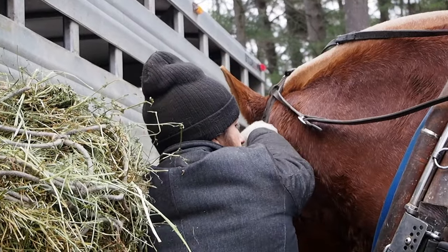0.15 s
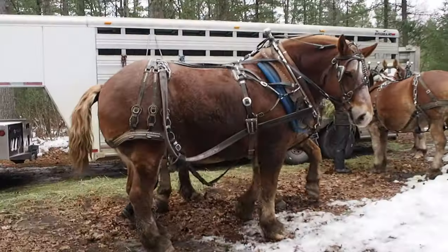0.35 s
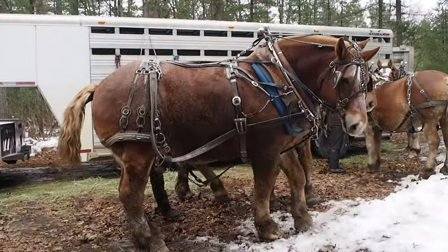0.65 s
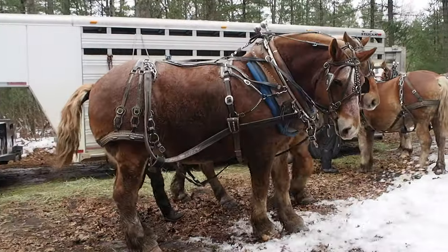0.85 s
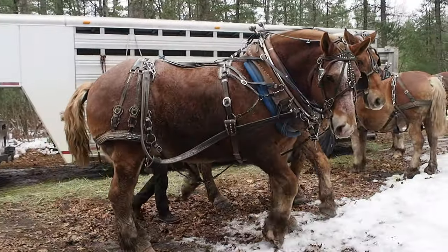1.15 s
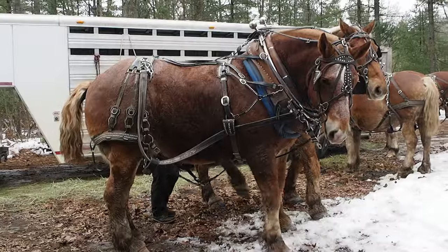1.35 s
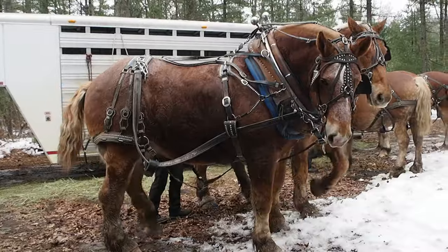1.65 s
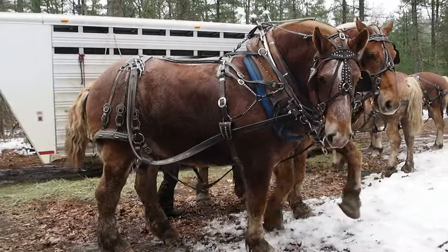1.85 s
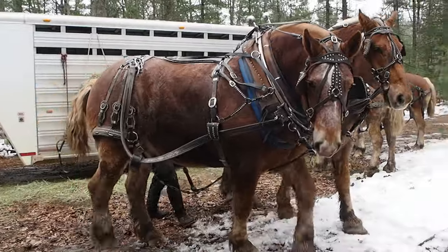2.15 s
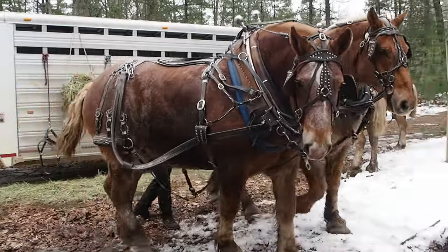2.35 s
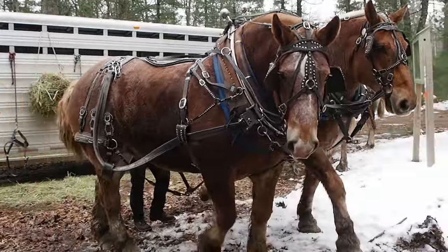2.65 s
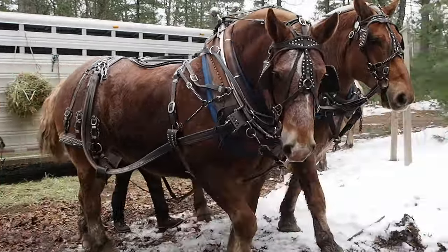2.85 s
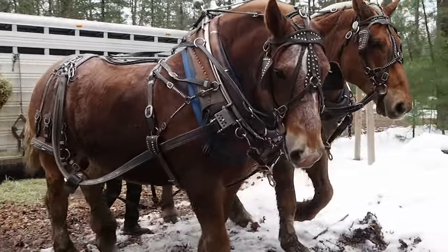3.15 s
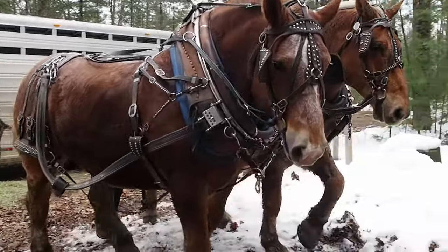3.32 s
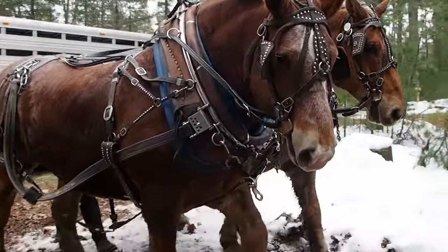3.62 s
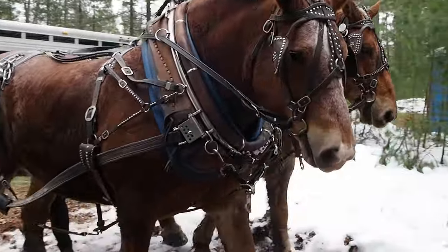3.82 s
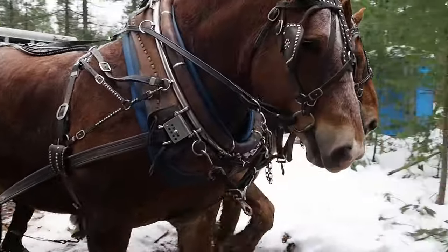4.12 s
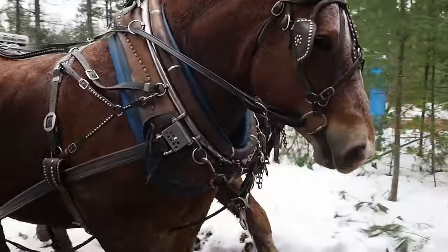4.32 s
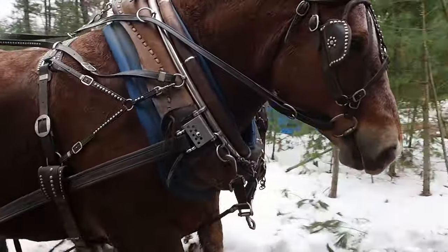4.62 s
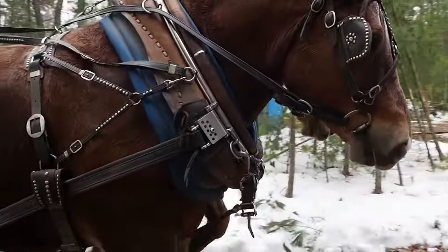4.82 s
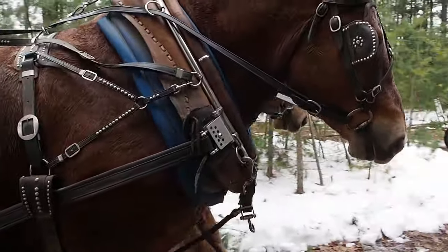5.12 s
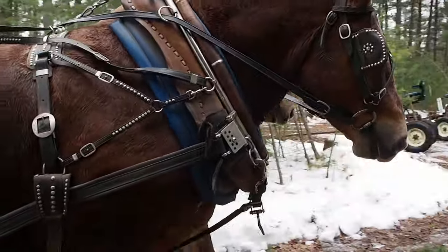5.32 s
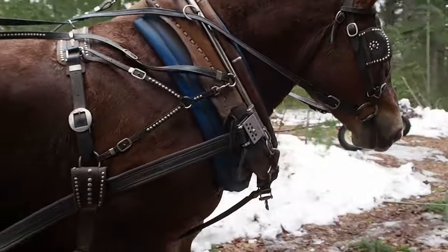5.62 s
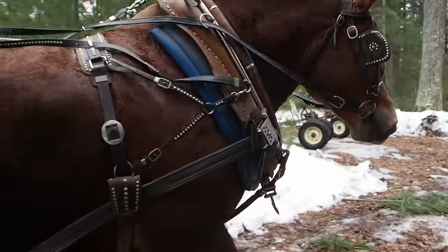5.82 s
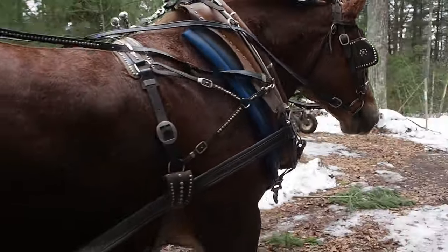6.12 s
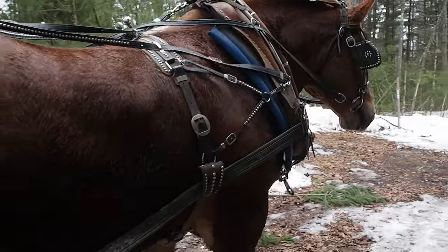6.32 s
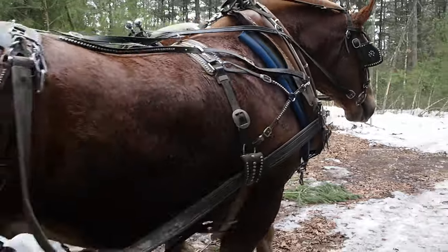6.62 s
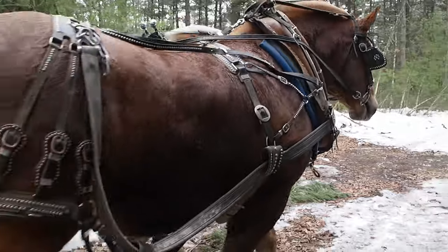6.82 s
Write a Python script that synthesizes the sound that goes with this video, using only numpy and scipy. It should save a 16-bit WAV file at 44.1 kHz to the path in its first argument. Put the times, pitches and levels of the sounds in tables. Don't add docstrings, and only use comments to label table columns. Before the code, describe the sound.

From 0 to 0.29 s it is quiet: muffled shuffling and a faint low bump, then a blink of complete silence. Around 0.3 s the fuller outdoor sound opens with a twig snap, and a strong dull hoof thud lands at 0.5 s. Until about 3.3 s heavy hooves crush and drag through wood chips, slightly left, with dry twig cracks and a growing rustle. The steps move right and become crisper on snow from 3.5 s. Harness metal enters at 3.7 s: uneven bright clinks and short ringing near 3.85, 4.2 and 4.5 s, dense buckle ticks around 5.1 s, the hardest double clink at 5.3 s, another cluster at 5.7 s. Deep thuds at 5.9 and 6.3 s sit right; a thin high chime rings at 6.05 s. Smaller ticks and crunches continue to 7 s, over soft wind, faint engine hum and slight clearing echoes.

```python
import sys
import numpy as np
from scipy import signal
from scipy.fft import rfft, irfft
from scipy.io import wavfile
from scipy.ndimage import uniform_filter1d

SR = 44100
rng = np.random.default_rng(int(sys.argv[2]) if len(sys.argv) > 2 else 0)


def invert_db(x):
    u = np.asarray(x, float) / 20
    return 10 ** u


def file_out(sig):
    cols = np.atleast_2d(sig).T
    lim = np.clip(cols, -1, 1)
    pcm = np.round(lim * 32767).astype(np.int16)
    wavfile.write(sys.argv[1], SR, pcm)


N = 307509

# start in seconds, end in seconds, fade-in in seconds.
SHOT_CHANGE = (0.2875, 0.3065, 0.011)
# time in seconds, bearing from 1 (left) to -1 (right).
TEAM_BEARING = [
    (0.5, 0.32),
    (2.2, 0.24),
    (3.2, -1.1),
    (6.9, -1.2),
]

# frequency in Hz, density in dB per Hz.
WIND_COLOUR = [(30, -40), (45, -36), (60, -15), (75, -2.5), (125, -0.5), (170, -8.5), (250, -4.5)]
# start in seconds, peak in dB.
GROUND_SHAKES = [(0.11, -46), (0.57, -45.5), (1.465, -41), (1.739, -58), (2.096, -40), (2.292, -42),
                 (2.422, -45), (3.416, -47), (4.08, -48), (4.383, -37), (4.855, -38.5), (5.165, -32.5),
                 (5.215, -41), (5.269, -48), (5.483, -39), (5.577, -41), (5.762, -42), (5.84, -50),
                 (5.878, -34), (6.037, -37), (6.16, -39), (6.33, -44), (6.367, -40), (6.463, -44),
                 (6.576, -42), (6.7, -41), (6.89, -48)]

# frequency in Hz, density in dB per Hz.
GROUND_COLOUR = [(60, -56), (170, -13.5), (350, -5), (650, -3.5), (1050, -6.5), (1400, -4), (1900, -5),
                 (2500, -4), (3100, -1), (4400, -1.5), (5400, -8.5), (7000, -11.5), (11000, -15),
                 (14000, -21), (16000, -30), (16700, -60)]
# frequency in Hz, level in dB.
SIDE_WIDTH = [(100, -1), (250, -3), (700, -3.5), (1300, -6.5), (2400, -9.5), (3200, -13), (4400, -13),
              (5800, -5), (8000, 1.5), (15000, 0.5)]
# frequency in Hz, likeness from 0 to 1.
SIDE_LIKENESS = [(150, 0.04), (600, 0.27), (2000, 0.35), (4000, 0.3), (6000, 0.02)]
# frequency in Hz, likeness from 0 to 1.
CAPSULE_LAG = [(2000, 0.13), (7000, 0.4)]
# time in seconds, level in dB.
BEDDING_SHUFFLE = [(0.0, -47), (0.12, -52), (0.27, -53.5), (0.322, -45), (0.336, -42.5), (0.74, -44),
                   (1.2, -45.5), (1.61, -45), (1.9, -43), (2.48, -39), (3.2, -42.5), (4.07, -40.5),
                   (4.94, -40), (5.5, -40), (5.81, -39.5), (6.35, -38.5), (6.97, -42)]
# middle in seconds, level in dB, weight in dB,
# half length in seconds.
HOOF_DRAGS = [(0.61, -45.5, 7.5, 0.11), (1.012, -40, -15.5, 0.28), (1.194, -37, -9, 0.11),
              (1.454, -39.5, -5.5, 0.22), (1.784, -35.5, -8, 0.13), (2.182, -36, -7.5, 0.36),
              (2.785, -31.5, -6, 0.12), (2.936, -32, -8, 0.31), (3.053, -33.5, -12.5, 0.28),
              (3.43, -34.5, -14.5, 0.29), (3.624, -39, 3.5, 0.097), (3.776, -36.5, -12, 0.27),
              (3.921, -33, -6, 0.14), (4.251, -36, -4.5, 0.15), (4.48, -41.5, -1, 0.12),
              (4.69, -35.5, -2.5, 0.19), (5.104, -43, -6, 0.13), (5.235, -28, -13.5, 0.19),
              (5.42, -37, -19, 0.32), (5.682, -39, -6.5, 0.084), (5.975, -31.5, -15, 0.081),
              (6.095, -34.5, -8.5, 0.17), (6.542, -39, -6.5, 0.17), (6.79, -35, -7, 0.27)]
# start in seconds, peak in dB, weight in dB, T60 in seconds.
CHIP_CRUSHES = [(0.2576, -30, -7, 0.046), (0.3634, -18.5, -7.5, 0.027), (0.546, -15, -9, 0.1),
                (0.579, -22.5, 0, 0.042), (0.5974, -30.5, 10.5, 0.034), (0.65, -29, -3, 0.27),
                (0.8589, -24, -7, 0.037), (0.882, -27, -7.5, 0.054), (1.1043, -20.5, -8.5, 0.1),
                (1.2156, -23, -6, 0.18), (1.468, -24.5, -5, 0.052), (1.6127, -24.5, -6, 0.029),
                (1.729, -12.5, -13.5, 0.084), (1.842, -25.5, -20, 0.073), (1.97, -17.5, -7.5, 0.089),
                (2.103, -13.5, -32, 0.027), (2.08, -23, -3, 0.056), (2.172, -19, -7, 0.038),
                (2.205, -23, -6, 0.059), (2.238, -18, -10.5, 0.068), (2.3848, -17.5, -12.5, 0.11),
                (2.413, -37, 2, 0.059), (2.604, -24, -36, 0.17), (2.652, -19.5, -3.5, 0.088),
                (2.675, -22.5, -2, 0.055), (2.738, -22, -1.5, 0.13), (3.093, -21.5, -24, 0.086)]
# start in seconds, peak in dB, weight in dB, T60 in seconds.
SNOW_CRUSHES = [(3.5174, -25.5, -11, 0.23), (3.867, -17.5, -12, 0.077), (4.0788, -19, -8, 0.07),
                (4.377, -17.5, -3, 0.035), (4.6194, -32, 8.5, 0.16), (5.118, -13, -8.5, 0.069),
                (5.1971, -28, -20, 0.12), (5.978, -22, -6, 0.11), (6.125, -26, -11, 0.072),
                (6.1943, -24, 3, 0.023), (6.291, -29, -5, 0.11), (6.5376, -20.5, 2.5, 0.024),
                (6.6763, -12.5, -10, 0.022), (6.753, -15.5, -12, 0.088), (6.785, -22.5, -36, 0.066)]

# start in seconds, peak in dB, pitch in Hz, left over right in dB.
HOOF_THUDS = [(0.108, -36, 135, -23), (0.337, -42, 542, -11), (0.502, -8, 460, 4), (0.518, -23, 335, 2),
              (0.601, -18, 423, 8), (1.111, -33, 497, 9), (1.22, -24, 488, -1.5), (1.473, -23, 310, 7),
              (1.478, -35, 173, 2), (2.059, -24, 542, -6), (2.105, -16, 207, 1), (2.172, -28, 225, -4),
              (2.183, -31, 526, 0), (2.36, -19.5, 502, -2), (2.376, -33, 277, -5), (2.436, -29, 450, -9),
              (2.658, -29, 643, 9), (2.739, -30, 507, 4), (3.394, -31, 610, -8), (3.863, -26, 600, -6),
              (4.08, -40, 613, -15), (4.385, -22, 678, 4), (4.837, -31, 277, -14), (5.033, -34, 553, -0.5),
              (5.146, -19.5, 292, -14), (5.251, -26, 275, -7), (5.456, -27, 285, -12),
              (5.568, -38, 210, -7), (5.858, -13.5, 303, -12), (5.86, -26, 540, -4), (6.024, -22, 303, -6),
              (6.025, -22, 800, 1), (6.197, -26, 736, -5), (6.132, -29, 588, -10), (6.128, -28, 256, -14),
              (6.318, -11.5, 271, -15.5), (6.541, -34.5, 315, -1.5), (6.684, -39, 560, 17),
              (6.812, -35, 225, -9), (6.867, -34, 472, -10), (6.87, -31, 278, -9)]
# start in seconds,
# peak in dB.
SHARP_SNAPS = [(2.7633, -16), (2.9027, -26), (4.3645, -15), (4.3895, -25), (5.6787, -20), (6.1965, -30),
               (6.692, -22), (6.7306, -20), (6.758, -16), (6.9068, -23), (3.1155, -23), (5.1285, -13),
               (4.7555, -23)]
# start in seconds, peak in dB, pitch in Hz.
TWIG_SNAPS = [(0.3663, -20, 4000), (0.5037, -22, 2830), (0.651, -19, 4540), (0.927, -25, 4000),
              (1.001, -27, 4100), (1.074, -21.5, 3420), (1.0267, -26, 3730), (1.284, -28, 3850),
              (1.347, -29, 1590), (1.358, -26.5, 1510), (1.773, -23, 3840), (2.461, -17.5, 4140),
              (3.067, -14.5, 3940), (3.114, -18, 4160), (3.2951, -23, 4160), (3.17, -26, 2100)]
# start in seconds, peak in dB, pitch in Hz.
BUCKLE_TICKS = [(4.308, -13.5, 2300), (4.3085, -16, 4120), (4.337, -21, 3940), (4.5, -18.5, 2280),
                (5.1266, -9, 3350), (5.138, -25, 3500), (5.198, -11, 4070), (5.821, -24, 3840),
                (5.963, -19, 4000), (6.442, -21.5, 3060), (6.879, -29, 3500), (4.331, -17, 3520),
                (4.3568, -19.5, 5350), (4.3642, -30, 7850), (4.364, -28, 5300), (4.4196, -12, 3600),
                (4.71, -19, 2980), (4.7553, -17.5, 2940), (4.9384, -22, 3770), (5.0552, -19.5, 4220),
                (5.0908, -17, 3180), (5.108, -10, 4750), (5.1186, -6, 3320), (5.124, -23, 3280),
                (5.6052, -23, 3670), (5.67, -24, 3650), (5.7184, -16.5, 1800), (5.8159, -18.5, 3440),
                (5.918, -23, 3570), (5.922, -22, 4000), (5.983, -15, 3900), (6.0244, -18, 3600),
                (6.1477, -16, 3020), (6.2933, -16, 2780), (6.1962, -19, 1570), (6.5025, -14, 3850),
                (6.5947, -19, 3850), (6.677, -24, 3330), (6.7128, -16, 1910), (6.7308, -18, 2380),
                (6.061, -18, 4970), (5.9848, -21, 1110), (6.0305, -25, 4360)]

# start in seconds, peak in dB, pitch in Hz, T60 in seconds.
LINK_CHIMES = [
    (4.4445, -25, 9900, 0.06),
    (4.4657, -28, 9900, 0.068),
    (5.5807, -29, 9980, 0.03),
    (5.7324, -24.5, 10000, 0.046),
    (6.0511, -14, 9900, 0.05),
    (6.5024, -28, 9910, 0.06),
    (6.5544, -40, 7250, 0.18),
    (6.6263, -31, 7260, 0.065),
    (6.8798, -32, 7240, 0.067),
]
# multiple of the pitch, level in dB.
LINK_PARTIALS = [(.5, -10), (1.0, 0), (1.095, -14), (1.368, -14)]
# start in seconds, level in dB, pitch in Hz, T60 in seconds.
LARGE_RING_NOTES = [(3.726, -14, 3000, 0.037), (3.7313, -22.5, 3140, 0.13), (3.8463, -16, 3100, 0.036),
                    (3.847, -9.5, 2960, 0.037), (3.858, -30, 3020, .15), (4.1553, -10, 3020, 0.042),
                    (4.1558, -22, 2780, .06), (4.169, -8, 3020, 0.029), (4.188, -30, 3060, .2),
                    (4.2346, -22.5, 2880, 0.056), (4.419, -26, 2990, 0.046), (4.4655, -31, 3040, .12),
                    (4.523, -8, 3020, 0.035), (4.5225, -22, 3400, 0.026), (4.544, -30.5, 3080, .13),
                    (4.544, -25, 2840, 0.083), (5.0092, -31, 3080, 0.3), (5.1194, -24, 3270, .1),
                    (5.329, -15, 3170, 0.036), (5.338, -29, 3060, 0.15), (5.678, -17, 3020, 0.058),
                    (5.699, -20, 3010, .062), (5.7135, -29, 2870, 0.073), (5.7254, -24, 2960, .07),
                    (5.741, -33, 3020, .12), (6.1256, -20, 3000, 0.055)]
# start in seconds, level in dB, pitch in Hz, T60 in seconds.
SMALL_RING_NOTES = [(3.7265, -23, 4260, .035), (3.7305, -31, 4060, 0.18), (3.7305, -32, 3760, .15),
                    (3.727, -31.5, 1180, 0.056), (3.803, -28, 4460, 0.067), (3.8458, -17.5, 3880, .05),
                    (3.8458, -16, 6410, .02), (3.9, -21.5, 4070, 0.041), (4.1558, -19, 3930, 0.089),
                    (4.1558, -26, 5180, .06), (4.157, -31.5, 1160, .06), (4.168, -26, 3920, 0.07),
                    (4.2358, -12, 3930, 0.03), (4.4655, -37, 6860, .1), (4.175, -30, 3400, 0.037),
                    (4.239, -29, 5200, .04), (4.528, -31, 2500, .025), (4.4655, -35, 3900, 0.076),
                    (4.5225, -21, 3850, 0.057), (5.003, -45, 4190, .3), (5.0232, -23, 3850, 0.056),
                    (5.0232, -30, 4140, 0.18), (5.0232, -26, 6770, .015), (5.3188, -20, 4240, 0.054),
                    (5.3188, -19, 3700, .03), (5.3266, -17, 3900, 0.022), (5.6785, -15, 3830, 0.082),
                    (5.6785, -16.5, 3560, 0.036), (5.6795, -32, 4960, .07), (5.6795, -33, 6950, 0.078),
                    (5.6975, -17, 3910, 0.07), (5.7118, -11, 4020, 0.043), (5.7135, -29, 4440, 0.073),
                    (5.736, -42, 3970, 0.14), (6.0512, -31, 5650, 0.064), (6.0512, -29, 3540, 0.092),
                    (5.6052, -19.5, 3780, 0.024), (5.8155, -22.5, 3860, 0.022), (5.8222, -21, 3980, .025),
                    (5.918, -24, 4120, 0.022), (4.3095, -26, 4270, 0.036)]
# start in seconds, level in dB, pitch in Hz, T60 in seconds.
STUD_NOTES = [(3.7265, -34, 7240, .08), (3.8458, -39, 7300, .06), (4.443, -33, 4970, 0.17),
              (4.4435, -42, 13250, 0.14), (4.5225, -30, 7460, .05), (4.5225, -31, 6840, .05),
              (5.024, -41, 7680, .07), (5.3262, -22, 11600, 0.035), (5.3188, -26, 8560, 0.06),
              (5.3262, -28, 6850, .03), (5.3262, -24, 8700, .035), (5.3188, -32, 13950, .04),
              (5.3188, -32, 13420, .04), (5.678, -29, 8480, 0.079), (5.6785, -29.5, 10200, 0.069),
              (5.6785, -39, 11600, .1), (5.6785, -44, 12950, .12), (4.1558, -39, 12100, .06),
              (4.364, -32, 12500, .015), (6.0512, -40, 9390, .06)]
# start in seconds, peak in dB, pitch of the strike in Hz,
# chatter in dB, upper modes in dB.
HARNESS_BLOWS = [(3.724, -21, 3830, -2, -16), (3.7305, -10, 4170, -5, -14), (3.8466, -6.5, 3050, -3.5, -7),
                 (3.9004, -20, 3950, -3, -20), (4.156, -12, 3620, 4, -2.5), (4.1673, -7.5, 3880, -3, -9),
                 (4.236, -10, 3840, -11, -33), (4.466, -24, 2970, 4, -14), (4.516, -17, 2500, -12, -25),
                 (4.5223, -4.5, 3300, -5, -32), (4.5297, -14, 3300, -5, -30), (5.024, -7.5, 3700, -8, -28),
                 (5.3191, -1, 3870, -10, -31), (5.3266, -1, 3960, -9, -35), (5.6791, -5.5, 4030, -5.5, -35),
                 (5.6957, -17, 3800, -1, -27), (5.7133, -11, 4070, -12, -32), (5.718, -8, 3840, -16, -32),
                 (6.0509, -19.5, 4700, 6, -24), (6.125, -15, 3450, -8, -25)]
# frequency in Hz, level in dB, T60 in seconds.
STEEL_MODES = [(7187, -5, 0.05), (7714, -2, 0.05), (8510, -3, 0.06), (10370, -3, 0.055), (11570, -17, 0.12),
               (13070, -14, 0.12)]


def evened(x):
    return x / np.sqrt(np.mean(x ** 2) + 1e-20)


def smoothed(x, size):
    return uniform_filter1d(x, size=size)


def read(points, hz):
    f, value = np.transpose(points)
    return np.interp(np.log(hz + 1), np.log(f + 1), value)


def add(mix, s, sound):
    part = mix[:, round(s * SR):][:, :sound.shape[1]]
    part += sound[:, :part.shape[1]]


def left_right(mid, side):
    return np.array([mid + side, mid - side])


def build_up(count, rise_s):
    return 1 - np.exp(-np.arange(count) / SR / rise_s)


def ring(hz, t60, phase=0.0):
    t = np.arange(round(.16 * SR)) / SR
    return np.sin(2 * np.pi * hz * t + phase) * invert_db(-60 * t / t60)


def rattle(length_s, low_hz=2300, high_hz=6500, order=2):
    count = 700
    t = np.arange(count) / SR
    burst = rng.standard_normal((2, count)) * build_up(count, .0001) * np.exp(-t / length_s)
    burst = signal.lfilter(*signal.butter(order, [low_hz, high_hz], "band", fs=SR), burst)
    return burst / abs(burst).max()


def above(x, hz):
    return signal.sosfilt(signal.butter(3, hz, "high", fs=SR, output="sos"), x)


def hum(pitch_hz=43, level_db=-77, side_db=8, waver=.3):
    slow = evened(smoothed(smoothed(rng.standard_normal(N), 6000), 6000))
    phase = 2 * np.pi * np.cumsum(pitch_hz + slow) / SR
    tone = invert_db(level_db) * np.sin(phase) * (1 + waver * slow[::-1])
    return left_right(tone, -invert_db(side_db) * tone)


def rumble(wind_db=-69, lumpy_db=2, side_db=5.5, rise_s=0.0035, t60=0.27, crest_db=-6):
    hz, t = np.fft.rfftfreq(N, 1 / SR), np.arange(0, N, 64) / SR
    colour = invert_db(read(WIND_COLOUR, hz)) * (hz < 260)
    mid, side = irfft(rfft(rng.standard_normal((2, N))) * colour, N)
    start, peak_db = np.transpose(GROUND_SHAKES)
    age = np.maximum(t - start[:, None], 0)
    shakes = invert_db(peak_db + crest_db) @ ((1 - np.exp(-age / rise_s)) * invert_db(-60 * age / t60))
    lumps = evened(smoothed(smoothed(rng.standard_normal(len(t)), 25), 25))
    level = np.repeat((invert_db(wind_db) + shakes) * invert_db(lumpy_db * lumps), 64)[:N]
    return smoothed(level, 64) * left_right(evened(mid), invert_db(side_db) * evened(side - 0.45 * mid))


def clearing(x, t60=0.55, wet_db=-16):
    length = SR // 3
    taps = np.zeros((2, length))
    slots = np.arange(200, length - 20, 20)
    at = slots + rng.integers(0, 20, (2, len(slots)))
    np.put_along_axis(taps, at, rng.choice([-1., 1.], at.shape), 1)
    taps *= invert_db(-60 * np.arange(length) / SR / t60)
    echoes = signal.fftconvolve(x, taps / np.linalg.norm(taps[0]), axes=1)[:, :N]
    return x + invert_db(wet_db) * echoes


def grains(per_s=5000, spread_db=1.0, hiss=0.98, snap_s=0.00059):
    size = invert_db(spread_db * np.minimum(rng.exponential(1, N), 3)) * (rng.random(N) < per_s / SR)
    direction = np.clip(rng.standard_normal((2, N)), -2, 2)
    colour = rng.integers(0, 6, N) == np.arange(6)[:, None, None]
    shapes = rng.standard_normal((6, 1, 128)) * np.exp(-np.arange(128) / SR / snap_s)
    bursts = signal.oaconvolve(size * direction * colour, shapes, axes=2).sum(0)[:, :N]
    return evened(bursts) + hiss * rng.standard_normal((2, N))


def weighted(weight_db, fizz_db, skim=0.27, heavy_db=7, muffle=1.7):
    fizz_db = fizz_db - skim * (weight_db + 8.0) - muffle * max(weight_db - heavy_db, 0)
    return invert_db(2 * np.array([[0], [weight_db], [fizz_db]]))


def drag_power(t, fizz_db=-8.5, spray=0.065):
    power = 0
    for middle, db, weight_db, half_s in HOOF_DRAGS:
        swell = np.cos(np.pi / 2 * np.clip((t - middle) / half_s, -1, 1)) ** 2
        power = power + invert_db(2 * db) * weighted(weight_db, fizz_db + spray * (db + 46)) * swell ** 2
    return power


def crush_power(t, fizz_db=-10.5, snow_crisp_db=2.5, hold=2.46, crest_db=-11):
    power = 0
    for table, crisp_db in ((CHIP_CRUSHES, 0), (SNOW_CRUSHES, snow_crisp_db)):
        for s, db, weight_db, t60 in table:
            age, rise = np.maximum(t - s, 0), 0.11 * t60
            sink = np.minimum(age / max(rise, .008), 1) ** 2
            give = invert_db(-120 * (np.maximum(age - rise, 0) / t60) ** hold)
            power = power + invert_db(2 * (db + crest_db)) * weighted(weight_db, fizz_db + crisp_db) * sink * give
    return power


def ground(shuffle_low_db=-7, shuffle_fizz_db=-9, patchy_db=2.0, flicker_db=1.05):
    hz, t, (mid, other) = signal.stft(grains(), SR, nperseg=256, noverlap=192)
    shuffle_db = np.interp(t, *np.transpose(BEDDING_SHUFFLE))
    shuffle = invert_db(2 * (shuffle_db + np.array([[0], [shuffle_low_db], [shuffle_fizz_db]])))
    power = shuffle + drag_power(t) + crush_power(t)

    low, fizz = read([(1200, 1), (2500, 0)], hz), read([(5000, 0), (7000, 1)], hz)
    regions = np.array([1 - low - fizz, low, fizz]) * invert_db(2 * read(GROUND_COLOUR, hz))
    regions *= len(hz) / regions.sum(1)[:, None]
    patches = uniform_filter1d(rng.standard_normal(mid.shape), size=5, axis=0)
    patches = evened(smoothed(patches, 14))
    flicker = evened(smoothed(rng.standard_normal(len(t)), 8))
    gain = np.sqrt(regions.T @ power / 2) * invert_db(patchy_db * patches + flicker_db * flicker)

    bearing = np.interp(t, *np.transpose(TEAM_BEARING))
    in_step = np.outer(read(SIDE_LIKENESS, hz), bearing - .3)
    likeness = in_step + 1j * (0.12 + np.outer(read(CAPSULE_LAG, hz), bearing))
    unlike = np.sqrt(np.clip(1 - abs(likeness) ** 2, 0, 1))
    side = invert_db(read(SIDE_WIDTH, hz))[:, None] * (likeness * mid + unlike * other)
    return signal.istft(left_right(mid * gain, side * gain), SR, nperseg=256, noverlap=192)[1][:, :N]


def hooves(soften_s=0.0044, overtone_db=-11, under_db=-14, heel_db=-15, heel_s=.016, apart=0.51):
    out = np.zeros((2, N))
    for s, db, hz, pan_db in HOOF_THUDS:
        t60 = 0.063 * invert_db(-0.5 * (db + 30))
        modes = ((0.995, 0, t60), (1.91, overtone_db, 1.1 * t60), (0.494, under_db, 1.36 * t60))
        knock = np.array([sum(invert_db(d) * ring(k * hz, ring_s, phase) for k, d, ring_s in modes)
                          for phase in (0, apart)])
        knock *= invert_db(db + np.array([[.5], [-.5]]) * pan_db) * build_up(knock.shape[1], soften_s)
        add(out, s, knock)
        add(out, s + heel_s, invert_db(heel_db) * knock)
    return out


def snaps(length_s=0.00046, low_hz=1300, high_hz=9000, side_db=-8):
    out = np.zeros((2, N))
    for s, db in SHARP_SNAPS:
        crack = invert_db(db) * rattle(length_s, low_hz, high_hz, order=1)
        add(out, s, left_right(crack[0], invert_db(side_db) * crack[1]))
    return out


def twigs_and_buckles(ring_db=-7, crack_db=-2, side_db=-13, spread=1.43):
    out = np.zeros((2, N))
    for s, db, hz in TWIG_SNAPS + BUCKLE_TICKS:
        t60 = 0.022 * invert_db(-0.35 * (db + 24.5))
        crack = invert_db(db + crack_db) * rattle(0.089 * t60, hz / spread, hz * spread)
        note = invert_db(db + ring_db) * ring(hz, t60)
        add(out, s, left_right(crack[0], invert_db(side_db) * crack[1]))
        add(out, s, left_right(note, invert_db(side_db) * note))
    return out


def chain(rise_s=0.0014):
    out = np.zeros((2, N))
    for s, db, hz, t60 in LINK_CHIMES:
        mid, side = (sum(invert_db(d) * ring(k * hz, t60, phase) for k, d in LINK_PARTIALS) for phase in (0, 2.2))
        add(out, s, invert_db(db - 3.0) * build_up(len(mid), rise_s) * left_right(mid, side))
    return out


def rings(flutter=.36, build_s=.0005):
    out = np.zeros((2, N))
    for s, db, hz, t60 in LARGE_RING_NOTES + SMALL_RING_NOTES + STUD_NOTES:
        mid, side = ring(hz, t60), invert_db(read(SIDE_WIDTH, hz)) * ring(hz, t60, 1.65)
        waver = evened(smoothed(rng.standard_normal(len(mid)), 200))
        size = invert_db(db) * (1 + flutter * waver) * build_up(len(mid), build_s)
        add(out, s, size * left_right(mid, side))
    return out


def harness(scatter_db=2, side_db=-6, strike_t60=0.004, chatter_s=0.0028, crack_side_db=-14, top_db=-10):
    out = np.zeros((2, N))
    hz, mode_db, t60 = np.transpose(STEEL_MODES)[:, :, None]
    for s, db, strike_hz, chatter_db, upper_db in HARNESS_BLOWS:
        gain, tune, turn = rng.standard_normal((3, 6, 1))
        size = invert_db(db + upper_db + mode_db + top_db + scatter_db * gain)
        mid, side = ((size * ring(hz + 15 * tune, t60, phase)).sum(0) for phase in (0, 2 * turn))
        strike = invert_db(db) * ring(strike_hz, strike_t60)
        crack = invert_db(db + chatter_db) * rattle(chatter_s)
        add(out, s, left_right(mid + strike, invert_db(side_db) * side + invert_db(crack_side_db) * strike))
        add(out, s, left_right(crack[0], invert_db(crack_side_db) * crack[1]))
    return out


def scene():
    small_parts = above(snaps() + twigs_and_buckles() + chain() + rings() + harness(), 800)
    struck = small_parts + above(hooves(), 100)
    return hum() + rumble() + ground() + clearing(struck)


def band_limit(x):
    return signal.sosfilt(signal.butter(12, 16640, fs=SR, output="sos"), x)


def record(dry):
    t, (start, end, fade) = np.arange(N) / SR, SHOT_CHANGE
    gate = np.where(t < start, 1, np.clip((t - end) / fade, 0, 1))
    mix = signal.lfilter(*signal.butter(2, 35, "high", fs=SR), dry) * gate
    top_edge = signal.firwin(255, 16300, window=("kaiser", 9), fs=SR)
    mix = signal.oaconvolve(mix, top_edge[None], "same")
    return band_limit(mix)


dry = scene()
out = record(dry)
file_out(out)
```